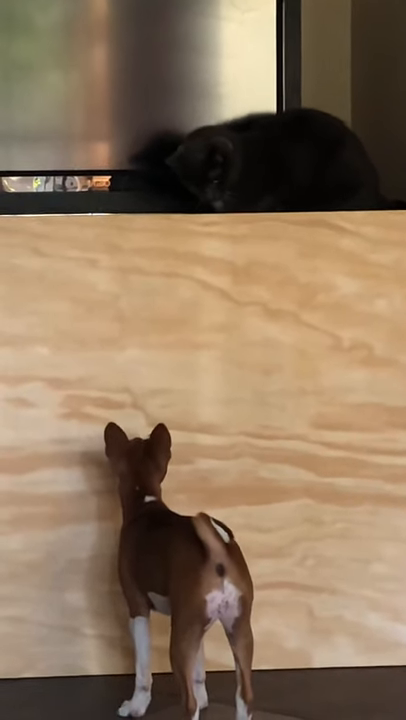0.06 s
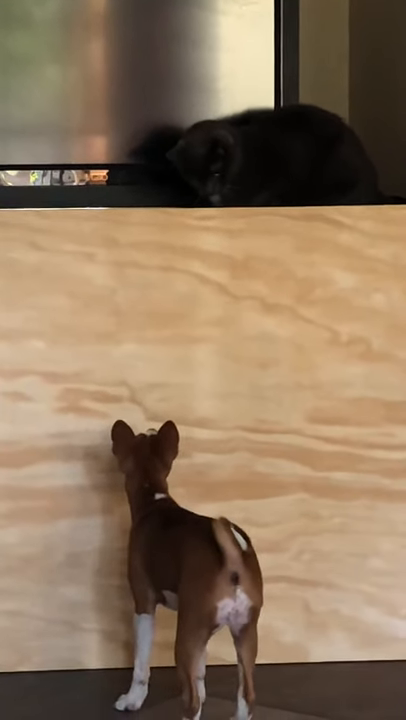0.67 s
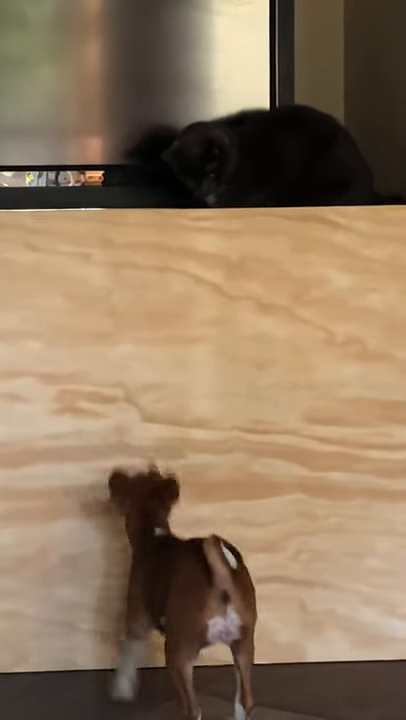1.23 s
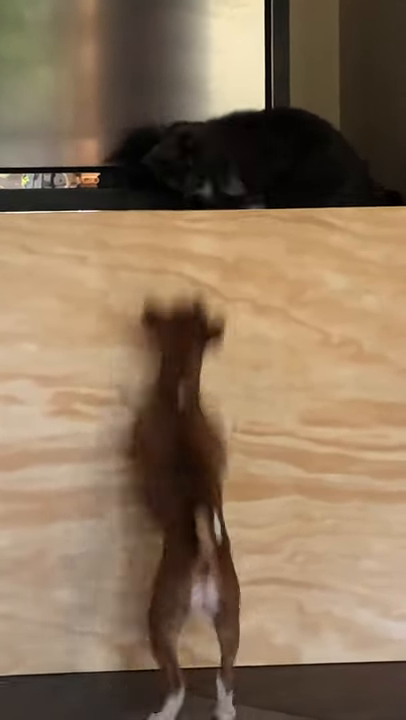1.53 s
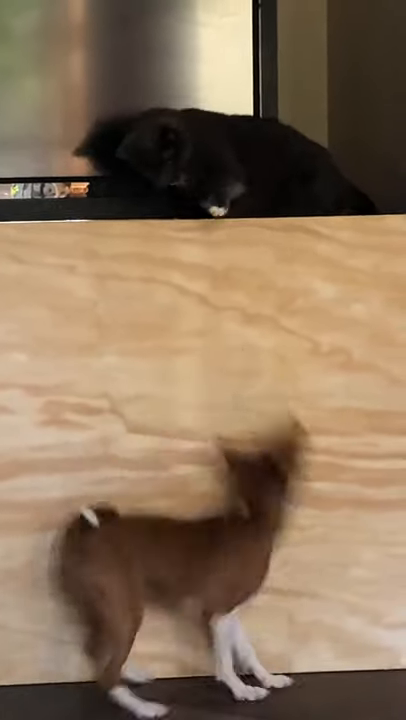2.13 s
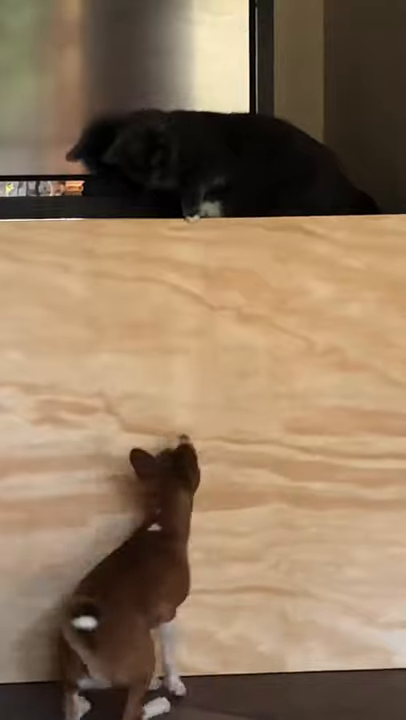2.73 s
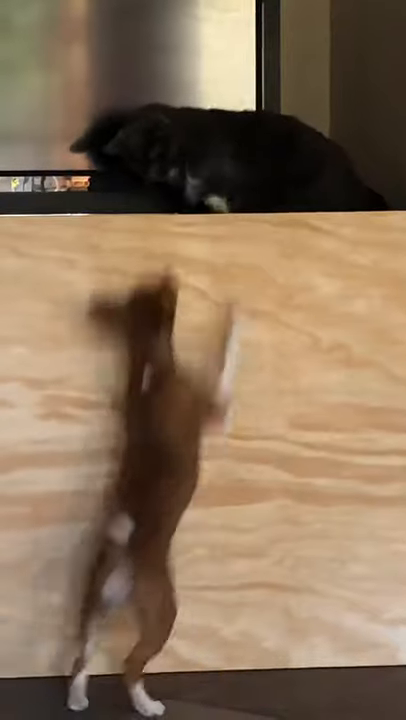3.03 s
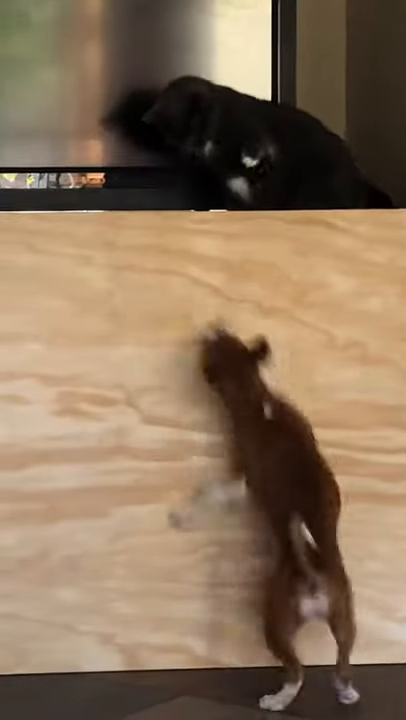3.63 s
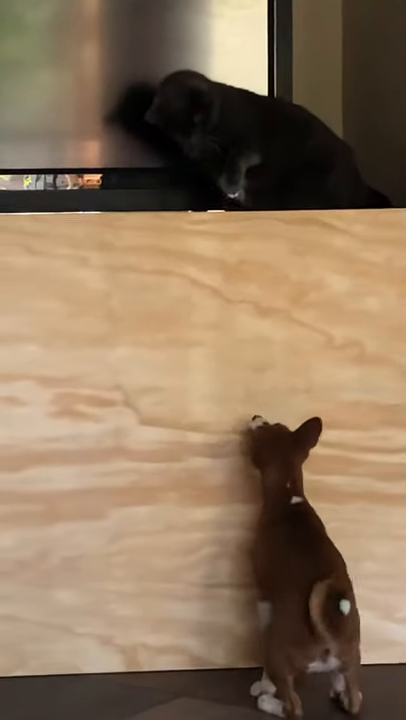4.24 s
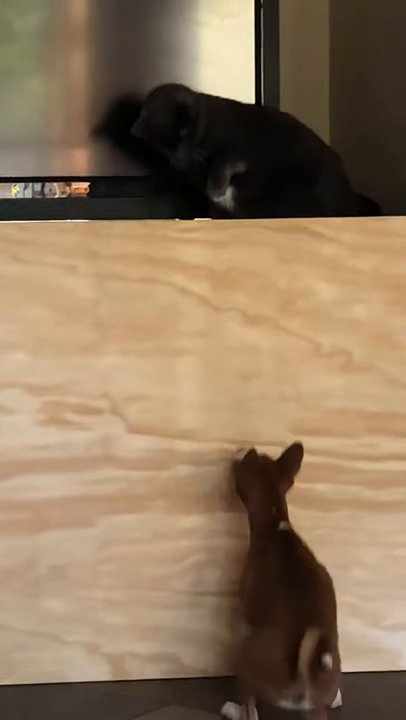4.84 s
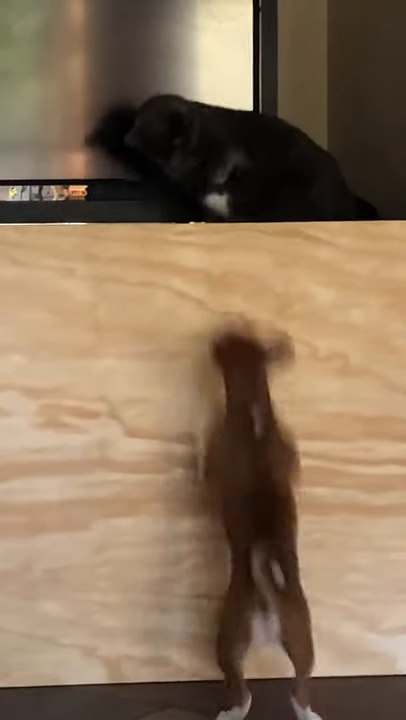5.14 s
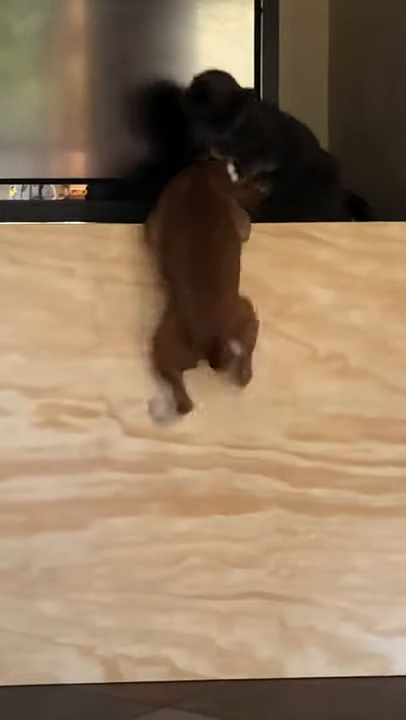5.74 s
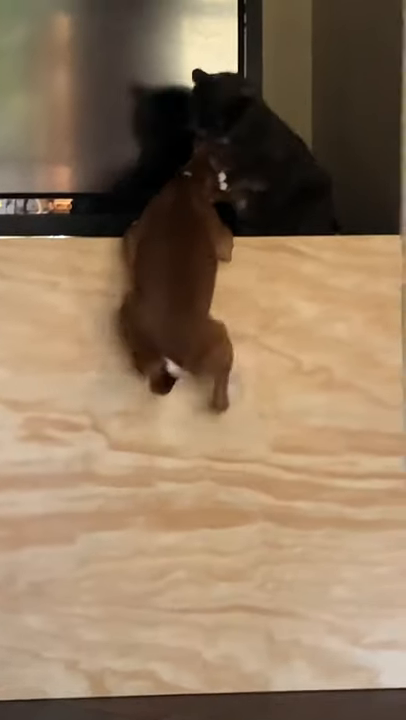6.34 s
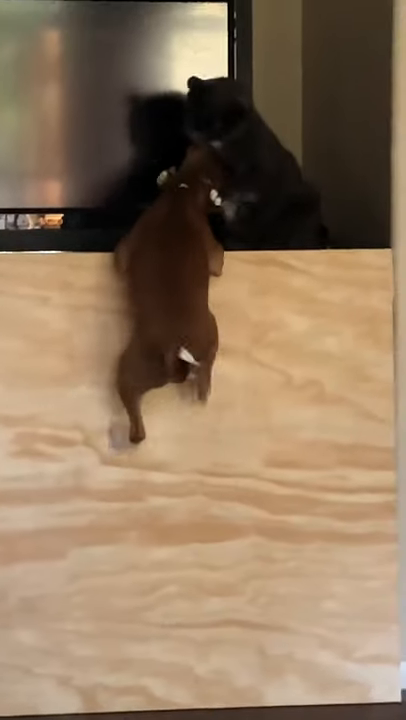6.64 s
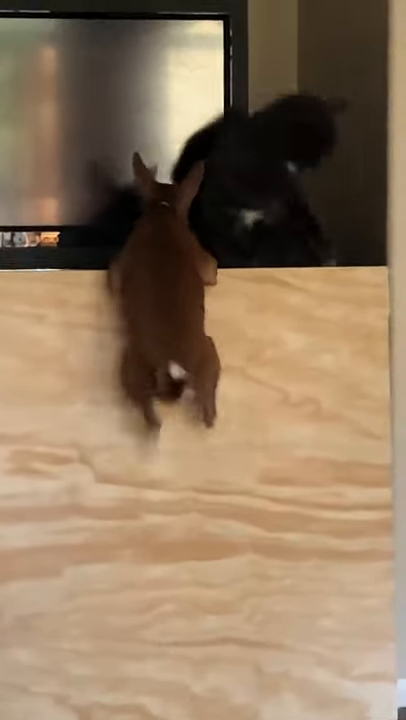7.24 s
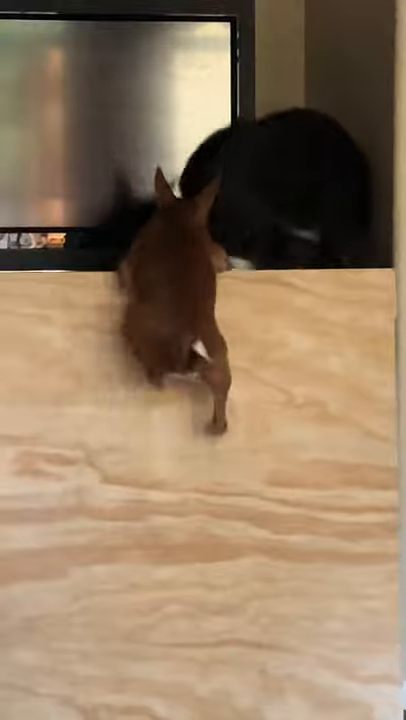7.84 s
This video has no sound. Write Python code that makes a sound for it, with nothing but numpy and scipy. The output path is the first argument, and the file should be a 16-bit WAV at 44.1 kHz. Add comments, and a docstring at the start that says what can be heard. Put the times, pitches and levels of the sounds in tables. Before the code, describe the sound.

In an echoing room, a puppy jumps at a wooden board three times with hollow thumps and claw scrapes, then keeps scrabbling.

```python
"""A house hums under a bare, echoing room. A puppy shuffles, a claw ticks and a small tag clinks.
Three times the puppy jumps at an upright plywood board: the impacts of paws and body excite the
panel's bending modes, and claws rasp down the grain by stick-slip friction, with brief squeals.
After the third jump it hangs from the top edge, where its forepaws grind and stir the panel.
A slipping pad judders, and the hind legs keep scrabbling to the end."""
import sys
import numpy as np
from scipy import signal
from scipy.fft import rfft, irfft
from scipy.io import wavfile
from scipy.ndimage import uniform_filter1d

SR = 44100
rng = np.random.default_rng(int(sys.argv[2]) if len(sys.argv) > 2 else 0)


def to_wav(sig):
    """Store sig (one row per channel, or 1-D mono) as 16-bit WAV at the path in sys.argv[1].

    Samples outside -1..1 are clipped; the rate is SR.
    """
    pcm = np.clip(np.atleast_2d(sig), -1, 1) * 32767
    pcm = np.round(pcm).astype(np.int16)
    wavfile.write(sys.argv[1], SR, pcm.T)  # frames by channels


N = 347922

# spectrum of the house's hum: f/Hz, relative level/dB
HUM_SPECTRUM = [(15, -53), (25, -40.5), (59, -0.5), (80, -2.5), (97, -5.5), (263, -7), (344, -11),
                (516, -15), (575, -16.5), (818, -14.5), (887, -19), (1400, -25), (2220, -30),
                (14400, -38.5), (16000, -56)]
# feet and fur shuffling on the floor between jumps: t/s, duration/s, level/dB
SHUFFLES = [(1.269, 0.12, -63), (1.379, 0.056, -57.5), (1.45, .066, -57), (2.451, 0.048, -62.5),
            (2.607, 0.13, -61), (2.822, 0.16, -62), (4.709, 0.16, -61), (5.0, .16, -61), (5.25, .05, -64)]
# pads rubbing dully at take-off and down the panel: t/s, duration/s, level/dB
PAD_RUBS = [(1.473, .036, -56.5), (3.009, 0.057, -57), (5.182, 0.05, -57.5), (5.993, 0.2, -49.5),
            (6.15, .2, -43.5)]
# brief squeals of a claw: t/s, duration/s, level/dB, f/Hz
SQUEALS = [(1.602, 0.062, -38.5, 1960), (1.935, .04, -52, 4020), (3.225, .05, -46, 3060)]
# sharpest landings of a claw tip: t/s, level/dB
TICKS = [(1.303, -56), (1.599, -39), (1.6418, -32.5), (1.828, -43.5), (2.13, -54.5), (3.556, -38),
         (5.244, -46.5), (5.369, -39), (5.378, -37), (5.56, -35.5), (5.666, -34), (6.013, -40),
         (6.947, -45), (7.783, -42)]
# spectrum of hissing claw tips: f/Hz, relative level/dB
TIP_SPECTRUM = [(1000, -58.5), (3000, 1.5), (5000, 1.5), (7000, -1), (9000, -1.5), (12000, -6.5),
                (16000, -13)]
# spectrum of rasping wood: f/Hz, relative level/dB
WOOD_SPECTRUM = [(200, -23), (500, -15), (800, -8.5), (1100, -4), (1400, -4), (1800, -1), (2400, 0.5),
                 (3100, -1), (3900, -2), (5000, -5.5), (7000, -10), (10000, -23), (16000, -19)]
# runs of clinks, as of a collar tag: t/s, duration/s, level/dB
JINGLES = [(1.401, .025, -53), (1.647, .006, -33.5), (1.95, .015, -47.5), (3.28, .08, -48.5),
           (3.419, .01, -41.5)]
# modes of the tag: f/Hz, relative level/dB, T60/s
TAG_MODES = [(9900, 1, 0.002), (11000, 3, .004), (11700, -7, 0.0055), (12800, -1, 0.0032),
             (14800, -10, .003)]
# paws and body striking the panel: t/s, force level/dB, contact time/ms (flesh long, bone short)
BLOWS = [(1.593, -38.5, 2.04), (1.644, -31.5, 2.1), (1.937, -29.5, 4.44), (2.138, -51.5, 0.37),
         (3.138, -37.5, 1.74), (3.235, -40, 6), (3.306, -38.5, 6.2), (3.41, -30.5, 2.5),
         (3.548, -22.5, 1.85), (3.558, -24, .95), (3.585, -30, .6), (3.629, -40, 8), (3.71, -44, 14),
         (5.362, -44, 2.2), (5.379, -28.5, 1.7), (5.44, -32.5, 3), (5.628, -25, 0.89), (5.675, -30.5, 1.54),
         (6.287, -37, 2.7)]
# bending modes of the panel: f/Hz, relative level/dB, T60/s
PANEL_MODES = [(40.6, 0, 0.42), (61.04, 8.5, 0.55), (74.6, 3.5, 0.19), (84, 5, 0.36), (101.8, -2, 0.2),
               (123.7, -9.5, 0.23), (156.8, 2.5, 0.18), (201.4, -2, 0.15), (247.4, 2, 0.074),
               (276.6, -1, 0.15), (328, 2.5, 0.078), (387, -2.5, 0.05), (452, 6, 0.019), (541, -6.5, 0.099),
               (623, 1, 0.041), (708, -5.5, 0.1), (797, 1, 0.054), (886, 10.5, 0.011), (1003, 10.5, 0.018),
               (1160, -2, 0.025), (1310, 20, 0.0046)]
# claws raking in the jumps and the climb: t/s, duration/s, rasp level/dB, hiss level/dB
STROKES = [(1.598, 0.041, -33.5, -51.5), (1.641, .09, -42, -60.5), (1.827, 0.058, -45.5, -57),
           (1.909, 0.065, -46, -56.5), (2.134, 0.064, -64.5, -61), (3.132, 0.054, -48.5, -58),
           (3.189, 0.12, -50.5, -65), (3.408, 0.11, -46, -55.5), (3.546, 0.089, -36, -43),
           (3.642, 0.24, -43, -48), (3.87, 0.0514, -41.5, -48.5), (5.32, .045, -56, -70),
           (5.372, 0.025, -27.5, -48.5), (5.412, 0.12, -40, -51.5), (5.531, 0.1, -38.5, -47),
           (5.665, .1, -39, -48.5), (5.771, 0.16, -42, -51), (6.22, 0.2, -53.5, -56)]
# forepaws grinding on the top edge: t/s, level/dB
GRIP_LEVELS = [(5.45, -46.5), (5.98, -52), (6.302, -51), (7.15, -53.5), (7.33, -48), (7.58, -49.5),
               (7.89, -53.5)]
# hind-leg kicks, in which the pad thumps and the claws rake, then catch again:
# t/s, force level/dB, contact time/ms, rake level/dB, catch delay/s, catch level/dB
KICKS = [(6.014, -39, 3.9, -43, 0.12, -47.5), (6.392, -43, 4.6, -45, .115, -46.5),
         (6.64, -45.5, 4.6, -44.5, 0.14, -41), (6.945, -41.5, 1.48, -42.5, .135, -48.5),
         (7.155, -48, 3.9, -44, .076, -40.5), (7.39, -36.5, 3.66, -46, .15, -50.5),
         (7.648, -43.5, 3.3, -45.5, 0.12, -43)]
# a pad sticking and slipping regularly: t/s, duration/s, first f/Hz, last f/Hz, level/dB
JUDDERS = [(6.279, 0.0333, 247.6, 267, -34.5), (6.281, 0.0606, 220.2, 198.2, -29.5),
           (6.335, 0.042, 355, 330, -37), (6.381, 0.122, 331, 343.5, -52.5)]
# reverberation time of the room: f/Hz, T60/s
ROOM_T60 = [(100, 0.71), (400, 0.65), (1000, 0.62), (2500, 0.68), (5000, 0.74), (9000, 0.49), (15000, 0.54)]
# spectrum of the reverberation: f/Hz, level/dB
ROOM_SPECTRUM = [(50, -19), (110, -5), (200, -3), (500, 0.5), (4000, -3.5), (14000, -8)]


def from_db(db):
    """Amplitude grows tenfold for every 20 dB."""
    return 10 ** (np.asarray(db) / 20)


def rms_one(x):
    """Division by the RMS value gives unit power."""
    return x / np.sqrt(np.mean(x ** 2) + 1e-20)


def at_hz(points, hz):
    """Interpolation on a logarithmic frequency axis."""
    where, value = np.transpose(points)
    return np.interp(np.log(np.maximum(hz, 1)), np.log(where), value)


def add(track, s, sound):
    """Superposition: a sound adds to the track from time s on."""
    start = int(s * SR)
    part = sound[:max(N - start, 0)]
    track[start:start + len(part)] += part


def colour(x, spectrum, size=512):
    """A minimum-phase filter imposes the spectrum; white noise keeps its power."""
    magnitude = from_db(at_hz(spectrum, np.fft.rfftfreq(size, 1 / SR)))
    cepstrum = irfft(np.log(magnitude))
    cepstrum[1:size // 2] *= 2
    cepstrum[size // 2 + 1:] = 0
    response = irfft(np.exp(rfft(cepstrum)))
    return signal.fftconvolve(x, response / np.linalg.norm(response))


def ring(force, hz, t60):
    """A damped oscillator answers a unit impulse with a decaying sine of unit height."""
    r, w = from_db(-60 / (t60 * SR)), 2 * np.pi * hz / SR
    return signal.lfilter([0, np.sin(w)], [1, -2 * r * np.cos(w), r * r], force + 1e-18)


def slips(count, per_s, spread_db, smooth):
    """Stick-slip friction: random snaps of uneven size over a smooth rub, at unit power."""
    sizes = from_db(spread_db * np.minimum(rng.exponential(1, count), 4))
    signs = rng.choice([-1, 1], count)
    snaps = sizes * signs * (rng.random(count) < per_s / SR)
    return rms_one(rms_one(snaps) + smooth * rng.standard_normal(count))


def pressure(count, edge):
    """The normal force of a paw rises, holds and falls."""
    return signal.windows.tukey(count, np.clip(edge, .05, 1))


def house_hum(level_db=-65):
    """The building's background is stationary noise, strongest in the bass."""
    hum = colour(rng.standard_normal(N + SR), HUM_SPECTRUM, size=8192)[SR:SR + N]
    return from_db(level_db) * rms_one(hum)


def scuffs():
    """Sliding friction gives a swelling band of noise, broad for fur and pads, narrow for a claw."""
    out, hz = np.zeros(N), np.geomspace(60, 16000, 64)
    fur = [(*row, 4800, 1.5) for row in SHUFFLES]
    pads = [(*row, 610, 1) for row in PAD_RUBS]
    claws = [(*row, 0.3) for row in SQUEALS]
    for s, length, level_db, centre_hz, width_octaves in fur + pads + claws:
        count = int(max(length, .01) * SR)
        detuning = np.log2(hz / centre_hz) / width_octaves
        band_db = -20 * np.log10(1 + detuning ** 2 + (detuning / 2) ** 6)
        rub = np.hanning(count) * slips(count, per_s=4000, spread_db=1.5, smooth=1.0)
        add(out, s, from_db(level_db) * colour(rub, list(zip(hz, band_db))))
    return out


def claw_ticks(decay_s=0.0072, wood_db=-3):
    """A brief impact has a broad spectrum: the claw tip cracks brightly and the wood answers."""
    out, t = np.zeros(N), np.arange(SR // 40) / SR
    for s, level_db in TICKS:
        tip, wood = from_db(level_db) * rng.standard_normal((2, len(t))) * np.exp(-t / decay_s)
        add(out, s, colour(tip, TIP_SPECTRUM) + from_db(wood_db) * colour(wood, WOOD_SPECTRUM))
    return out


def tag_clinks(mean_gap_s=.008, uneven_db=1.5):
    """Free vibration: each irregular touch rings the tag's modes with new strengths."""
    out, touches = np.zeros(N), []
    for start, length, db in JINGLES:
        gaps = rng.exponential(mean_gap_s, 20)
        touches += [(start + after, db) for after in np.cumsum(gaps) - gaps[0] if after <= length]
    s, level_db = np.transpose(touches)
    scatter_db = rng.normal(0, uneven_db, (len(s), len(TAG_MODES)))
    for k, (hz, mode_db, t60) in enumerate(TAG_MODES):
        impulses = np.zeros(N)
        impulses[(s * SR).astype(int)] = from_db(level_db + mode_db + scatter_db[:, k])
        out += ring(impulses, hz, t60)
    return out


def all_blows(lag_s=.048, weight_db=-43, weight_ms=4.8, typical_db=-37.5, db_per_db=0.37):
    """Momentum arrives in two impacts: first the paw, then, softly, the weight behind it."""
    paws = BLOWS + [kick[:3] for kick in KICKS]
    weight = [(s + lag_s, weight_db + db_per_db * (db - typical_db), weight_ms) for s, db, _ in paws]
    return paws + weight


def panel_thumps(rise_db_per_octave=8, fall_db_per_octave=8.5, uneven_db=1.0, sway_hz=140):
    """An impact best excites modes whose half period is near its contact time: flesh low, bone high."""
    s, blow_db, contact_ms = np.transpose(all_blows())
    favoured_hz = 1000 / (2 * np.maximum(contact_ms, .2))
    luck = rng.standard_normal((len(s), 2, len(PANEL_MODES)))
    out = np.zeros(N)
    for k, (hz, mode_db, t60) in enumerate(PANEL_MODES):
        octaves = np.log2(hz / favoured_hz)
        force_db = blow_db + np.minimum(rise_db_per_octave * octaves, -fall_db_per_octave * octaves)
        # low neighbours start in antiphase, so the boom swells; higher up the spot struck sets the sign
        sign = (-1) ** k if hz < sway_hz else np.sign(luck[:, 1, k])
        impulses = np.zeros(N)
        impulses[(s * SR).astype(int)] = sign * from_db(force_db + mode_db + uneven_db * luck[:, 0, k])
        out += ring(impulses, hz, t60)
    return out


def all_strokes(lag_s=.018, rake_s=0.086, catch_s=0.054, hiss_db=-51.5, typical_db=-44, db_per_db=1.75):
    """Each kick adds a rake and a catch to the strokes; their friction hiss grows with force."""
    rakes = []
    for s, _, _, rake_db, after, catch_db in KICKS:
        rakes += [(s + lag_s, rake_s, rake_db), (s + after, catch_s, catch_db)]
    return STROKES + [(s, span, db, hiss_db + db_per_db * (db - typical_db)) for s, span, db in rakes]


def wood_rasp(friction, tilt_db_per_octave, claw_hz, claw_db=-7, q=12):
    """Source and filter: the wood colours the friction, and each claw stresses its own narrow band."""
    spectrum = [(hz, db + tilt_db_per_octave * np.log2(hz / 2000)) for hz, db in WOOD_SPECTRUM]
    rasp = colour(friction, spectrum)
    resonances = sum(signal.lfilter(*signal.iirpeak(hz, q, fs=SR), rasp) for hz in claw_hz)
    return rasp + from_db(claw_db) * resonances


def claw_scratches(lead_s=.006, ease_s=0.017, rasp_fade_db_per_s=24.5, hiss_fade_db_per_s=37):
    """Stick-slip on the grain makes the wood rasp and the tips hiss; both fade as the stroke slows."""
    out, strokes = np.zeros(N), all_strokes()
    pitches = np.exp(rng.uniform(np.log(1700), np.log(5200), (len(strokes), 3)))
    for (s, length, rasp_db, hiss_db), claw_hz in zip(strokes, pitches):
        span = max(length, .01) + 2 * lead_s
        count = int(span * SR)
        t, press = np.arange(count) / SR, pressure(count, edge=2 * ease_s / span)
        bite = press * slips(count, per_s=900, spread_db=2.0, smooth=0.44)
        bite *= from_db(rasp_db - rasp_fade_db_per_s * t)
        glide = press * slips(count, per_s=2000, spread_db=3.8, smooth=1.0)
        glide *= from_db(hiss_db - hiss_fade_db_per_s * t)
        tilt = 1.5 + 0.23 * (hiss_db - rasp_db)   # the more the tips hiss, the brighter the rasp
        add(out, s - lead_s, from_db(-1.32) * wood_rasp(bite, tilt, claw_hz))
        add(out, s - lead_s, from_db(1.5) * colour(glide, TIP_SPECTRUM))
    return out


def grip_grind(creep_s=.07, lead_s=.04, uneven_db=3.5, hiss_db=-19):
    """Friction under load yields in short creeps over the edge, each gritty and with its own pitches."""
    times, level_db = np.transpose(GRIP_LEVELS)
    out, count = np.zeros(N), int(2 * creep_s * SR)
    for s in np.arange(times[0] - lead_s, N / SR, creep_s):
        gain = from_db(np.interp(s, times, level_db) + uneven_db * rng.standard_normal())
        grind = gain * np.sqrt(np.hanning(count)) * slips(count, per_s=320, spread_db=2.7, smooth=0.34)
        claw_hz = np.exp(rng.uniform(np.log(1000), np.log(3200), 3))
        rasp = wood_rasp(grind, tilt_db_per_octave=-3, claw_hz=claw_hz)
        add(out, s - creep_s / 2, rasp + from_db(hiss_db) * colour(grind, TIP_SPECTRUM))
    return out


def panel_rumble(relative_db=-11):
    """Forced vibration: the grinding grip keeps the panel's modes faintly stirring."""
    times, level_db = np.transpose(GRIP_LEVELS)
    t = np.arange(N) / SR
    hanging = t > times[0]
    friction = slips(N, per_s=150, spread_db=2.0, smooth=0.43) * hanging
    stirred = sum(from_db(mode_db) * ring(friction, hz, t60) for hz, mode_db, t60 in PANEL_MODES)
    return from_db(relative_db + np.interp(t, times, level_db)) * stirred / np.std(stirred[hanging])


def pad_judders(overtone_db=-15):
    """Periodic stick-slip: a pad grips and lets go hundreds of times a second, and the panel groans."""
    out = np.zeros(N)
    for s, length, first_hz, last_hz, level_db in JUDDERS:
        count = int(length * SR)
        phase = 2 * np.pi * np.cumsum(np.linspace(first_hz, last_hz, count)) / SR
        tone = np.sin(phase) + from_db(overtone_db) * np.sin(2 * phase)
        add(out, s, from_db(level_db) * pressure(count, edge=0.15) * tone)
    return out


def room_tail(build_s=0.0011):
    """Hard walls build a diffuse field that decays exponentially, soonest in the high treble."""
    t = np.arange(SR) / SR
    white, tail = rfft(rng.standard_normal(SR)), np.zeros(SR)
    hz, edges = np.fft.rfftfreq(SR, 1 / SR), np.geomspace(30, 18000, 25)
    for low, high in zip(edges, edges[1:]):
        centre = np.sqrt(low * high)
        envelope = from_db(-60 * t / at_hz(ROOM_T60, centre)) * (1 - np.exp(-t / build_s))
        band = irfft(white * ((hz >= low) & (hz < high)), SR) * envelope
        gain = from_db(at_hz(ROOM_SPECTRUM, centre)) * np.sqrt(2 * (high - low) / SR)
        tail += gain * band / np.linalg.norm(band)
    return tail


def room(x, direct_db=-6.0, spots=5, moves_per_s=14):
    """Reflections depend on source position: each spot the paws move to has its own impulse response."""
    spot = (np.arange(N) // (SR // moves_per_s)) % spots
    shares = [uniform_filter1d(1. * (spot == k), SR // 100) for k in range(spots)]   # 10 ms crossfades
    reverberation = sum(signal.oaconvolve(x * share, room_tail())[:N] for share in shares)
    return from_db(direct_db) * x + reverberation


def scene(groan_direct_db=-5, groan_room_db=-4.5):
    """The sources superpose across the room; the panel faces the listener, so its groan is more direct."""
    groan = pad_judders()
    puppy = panel_thumps() + panel_rumble() + claw_scratches() + grip_grind()
    puppy += scuffs() + claw_ticks() + tag_clinks() + from_db(groan_room_db) * groan
    return (room(puppy) + from_db(groan_direct_db) * groan + house_hum())[None]


def record(dry, low_hz=32, high_hz=15900):
    """Band limiting: the microphone sheds the deepest bass, and a steep low-pass cuts the top."""
    thinned = signal.sosfilt(signal.butter(2, low_hz, "high", fs=SR, output="sos"), dry)
    return signal.sosfilt(signal.ellip(12, .1, 80, high_hz, fs=SR, output="sos"), thinned)


dry = scene()
out = record(dry)
to_wav(out)
```